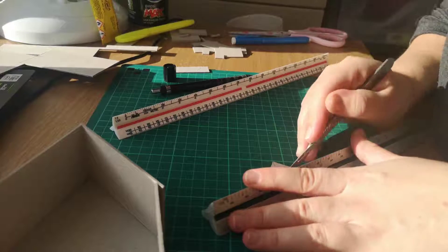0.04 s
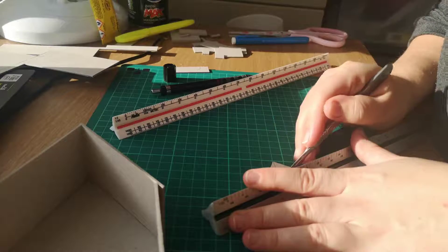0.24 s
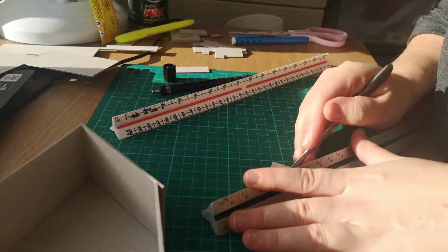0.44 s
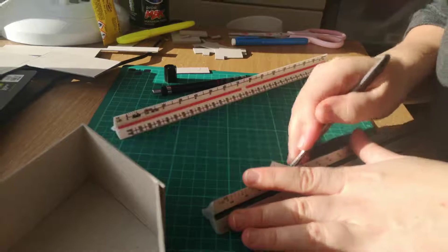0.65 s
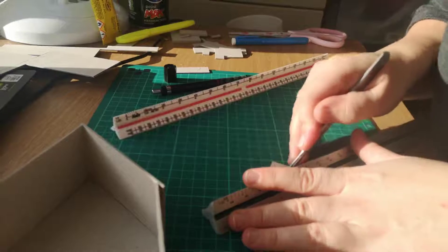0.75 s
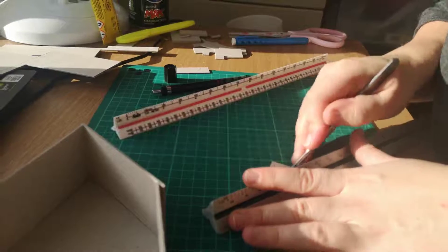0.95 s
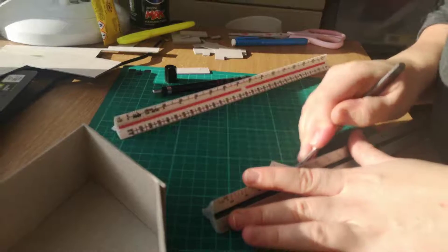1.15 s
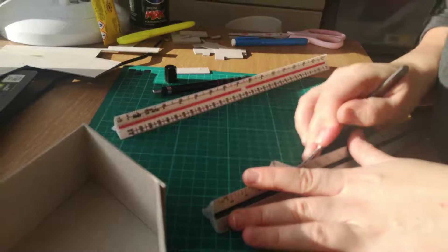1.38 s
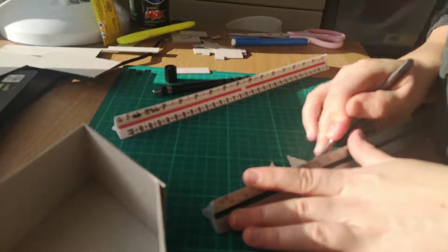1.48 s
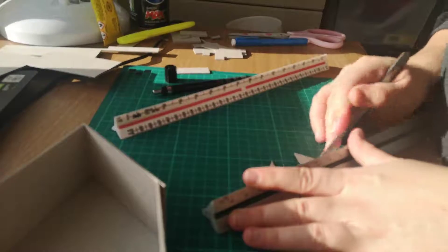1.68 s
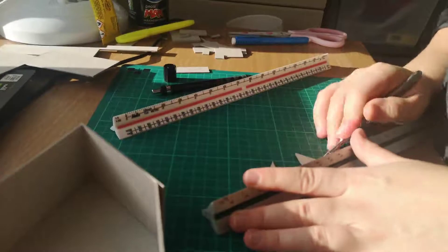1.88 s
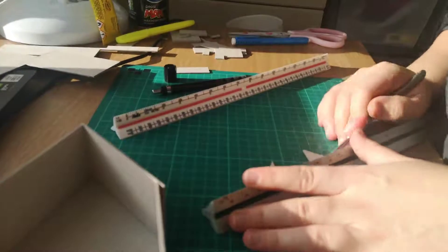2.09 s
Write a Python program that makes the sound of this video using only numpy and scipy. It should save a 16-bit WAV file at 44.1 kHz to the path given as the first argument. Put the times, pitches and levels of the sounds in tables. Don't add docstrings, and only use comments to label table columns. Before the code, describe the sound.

A craft knife cuts thin card along a ruler, close up in a quiet, dry room. A short scratch with tiny blade ticks comes at 0.15 s, then faint taps around 0.65 s. From 0.93 s the blade bites and scrapes unevenly with small knocks. At 1.48 s a hand thumps the desk with a sharp click and the loudest rasp, fading by 1.7 s. Faint scratching returns near 2.1 s over low hum and hiss.

```python
import sys
import numpy as np
from scipy import signal
from scipy.fft import rfft, irfft
from scipy.io import wavfile
from scipy.ndimage import uniform_filter1d

SR = 44100
rng = np.random.default_rng(int(sys.argv[2]) if len(sys.argv) > 2 else 0)


def bounce(signal):
    frames = np.transpose(np.atleast_2d(signal))
    limited = np.clip(frames, -1, 1)
    pcm = np.round(limited * 32767).astype(np.int16)
    wavfile.write(sys.argv[1], SR, pcm)


def amplitude_ratio(level_db):
    exponent = np.asarray(level_db, float) / 20
    return 10 ** exponent


N = 93800
LAG_MS = 0.604

# t/s, friction level/dB, desk shake level/dB
TOUCH_DRAG = [(.136, -89, -69), (.139, -65, -80), (.16, -54.5, -57), (.175, -63.5, -61), (.19, -65.5, -67),
              (.205, -90, -81), (.225, -98, -76)]
BITE_DRAG = [(0.901, -72, -63), (0.938, -73, -61), (0.947, -60.5, -45.5), (.975, -59, -48),
             (1.009, -63, -62), (1.043, -83, -58)]
SCORE_DRAG = [(0.998, -67, -74), (1.044, -65.5, -68), (1.052, -65, -53), (1.083, -65.5, -68),
              (1.088, -60.5, -65), (1.108, -65, -58.5), (1.118, -59.5, -67.5), (1.175, -59.5, -51.5),
              (1.21, -61.5, -53), (1.224, -59, -49), (1.272, -64, -59), (1.332, -64.5, -74),
              (1.354, -61.5, -59), (1.412, -64.5, -66), (1.47, -62, -57.5), (1.483, -62.5, -54)]
PULL_DRAG = [(1.48, -65, -71), (1.484, -54, -71), (1.497, -58, -44), (1.53, -52.5, -47), (1.575, -53, -47),
             (1.611, -57.5, -49.5), (1.629, -67, -56), (1.67, -72.5, -63), (1.74, -77.5, -71.5)]
NEXT_DRAG = [(1.849, -85, -66.5), (1.9, -75.5, -76), (1.97, -85.5, -69.5), (2.0, -73.5, -73),
             (2.05, -74, -60.5), (2.095, -72, -72), (2.127, -63.5, -61.5)]
# f/Hz, level per Hz/dB
PULL_TONE = [(250, -12), (900, -5.5), (1440, -10.5), (2690, -5), (3300, -14), (7540, -15), (10200, -23),
             (15500, -42)]
# f/Hz, width/Hz, lift/dB
PULL_RING = [(820, 62, 12.3), (1015, 40, 5), (1245, 68, 11.8), (1630, 130, 4), (2070, 110, 11.7),
             (2490, 33, 4.8), (2696, 180, 9), (3950, 120, 10), (4390, 80, 8.1), (5780, 98, 8.5),
             (7370, 350, 8.1)]


def unit(x):
    return x / np.sqrt(np.mean(x ** 2))


def on_log_axis(tone, outside=None):
    f = np.maximum(np.arange(N // 2 + 1) * SR / N, 1)
    tone = np.array(tone)
    return np.interp(np.log(f), np.log(tone[:, 0]), tone[:, 1], left=outside, right=outside)


def colour(x, tone, rings=(), patches=None):
    f = np.maximum(np.arange(N // 2 + 1) * SR / N, 1)
    spectrum = rfft(x) * amplitude_ratio(on_log_axis(tone, -90))
    out = irfft(spectrum, N)
    for k, (hz, width, db) in enumerate(rings):
        resonance = (amplitude_ratio(db) - 1) / (1 + (2 * (f - hz) / width) ** 2)
        lift = irfft(spectrum * resonance, N)
        swelling = patches is not None and db > 0
        out = out + lift * (patches[k] if swelling else 1)
    return unit(out)


def walk(rate):
    k = int(SR / rate)
    steps = np.repeat(rng.standard_normal(N // k + 1), k)
    smooth = uniform_filter1d(uniform_filter1d(steps, k), k)
    return unit(smooth[:N])


def gain(rows, col):
    rows = np.array(rows)
    return amplitude_ratio(np.interp(np.arange(N) / SR, rows[:, 0], rows[:, col], left=-120, right=-120))


def pair(x, ms):
    left_db = 1
    f = np.arange(N // 2 + 1) * SR / N
    late = irfft(rfft(x) * np.exp(-2j * np.pi * f * ms / 1000), N)
    return np.array([x * amplitude_ratio(left_db / 2), late * amplitude_ratio(-left_db / 2)])


def floor():
    # f/Hz, level per Hz/dB
    hum_tone = [(12, -71), (20, 2.5), (59, -10.5), (76, -11.5), (107, -15.5), (134, -21.5), (210, -20.5),
                (568, -36), (700, -35), (910, -105), (1540, -120)]
    hiss_tone = [(290, -36), (500, -12), (666, -71), (716, 1), (1770, 2.5), (4130, -4), (7760, -7.5),
                 (9770, -14.5), (16200, -16)]
    # f/Hz, width/Hz, lift/dB
    hiss_ring = [(1950, 400, 3), (2610, 280, 4.6), (8300, 430, 1.4)]
    hum_db, hiss_db = -61, -73
    alike_below_hz, hiss_alike = 900, 0.36
    n = rng.standard_normal((5, N))
    apart = signal.lfilter(*signal.butter(2, alike_below_hz, "high", fs=SR), n[1])
    swell = amplitude_ratio(1.94 * walk(9.4))
    hum = [colour(v + w * apart, hum_tone) * swell for v, w in zip(pair(n[0], 0.52), (1, -1))]
    hiss = []
    for shared, own in zip(pair(n[2], LAG_MS), n[3:]):
        side = colour(hiss_alike * shared + own, hiss_tone, hiss_ring)
        hiss.append(side * amplitude_ratio(0.94 * walk(6.71)))
    return amplitude_ratio(hum_db) * np.array(hum) + amplitude_ratio(hiss_db) * np.array(hiss)


def room(x):
    t60_s, level_db, low_cut_hz = .1, -7, 410
    t = np.arange(SR // 3) / SR
    tail = rng.standard_normal((2, len(t))) * amplitude_ratio(-60 * t / t60_s) * (t > .002)
    tail = tail / np.sqrt(np.sum(tail ** 2, axis=1, keepdims=True))
    x = signal.lfilter(*signal.butter(2, low_cut_hz, "high", fs=SR), x)
    return amplitude_ratio(level_db) * signal.fftconvolve(x[None], tail, axes=1)[:, :N]


def strike(rows, modes):
    push, t = np.zeros(N), np.arange(N) / SR
    for s, db, ms, way in rows:
        contact = np.clip((t - s) * 1000 / ms, 0, 1)
        push += way * amplitude_ratio(db) * np.sin(np.pi * contact) ** 2
    ring = np.zeros(N)
    for hz, db, t60 in modes:
        ring += amplitude_ratio(db - 60 * t / t60) * np.cos(2 * np.pi * hz * t) * 2 * np.pi * hz / SR
    return push, signal.fftconvolve(push, ring[:SR // 2])[:N]


def desk():
    # t/s, level/dB, contact/ms, push direction
    knocks = [(.337, -62, 12, 0.88), (.788, -60.5, 12, 0.73), (0.945, -57, 7.5, 1), (.962, -53, 8.9, 0.92),
              (.978, -54.5, 4.8, 0.96), (1.028, -62, 8.6, 0.7), (1.145, -60, 9.1, 0.91),
              (1.205, -63.5, 5.2, 0.8), (1.275, -51.5, 10.6, 0.49), (1.335, -65, 5.4, 0.81),
              (1.665, -59.5, 2.4, 0.48), (2.031, -58, 8.8, 0.31)]
    landing = [
        (1.4812, -30, 5.7, -1),
        (1.4848, -29.5, 9.3, 1),
        (1.5074, -29.4, 13, -1),
        (1.5348, -39.7, 5.9, 1),
        (1.5931, -46, 8.9, 1),
    ]
    taps = [(.1366, -42.5, 2.75, -0.42), (.6372, -47, 2.26, 0.66), (.65, -55.5, 1.86, 1),
            (.777, -67, 3.2, 0.52), (.945, -55.5, 2.9, 0.82), (.967, -47.5, 3, -0.49),
            (1.123, -53, 2, 0.69), (1.148, -47, 2, -0.69), (1.345, -59, 2.6, 0.35),
            (1.483, -40.5, 2.2, -0.56), (1.535, -44, 3.7, 0.97), (1.605, -49.5, 2.25, 1),
            (1.66, -51, 4.7, -0.82), (2.003, -70, 1.8, 0.39), (2.023, -58.5, 4.1, -0.95)]
    # f/Hz, level/dB, t60/s
    desk_modes = [(56.8, -15.4, .33), (82.7, 0, .18), (120.4, -4.6, .12), (152.5, -6.5, .23),
                  (201.6, -18.8, .25), (304.7, -6.6, .15)]
    card_modes = [(76, -0.5, 0.088), (142, -8, 0.15), (196.7, -15.5, 0.22), (299, -17.5, 0.17),
                  (435.6, -19.5, 0.077), (535, -29.5, 0.45), (810, -16, 0.17)]
    # f/Hz, level per Hz/dB
    shake_tone = [(12, -7), (20, -6), (70, -9), (118, -3), (248, -29.5), (308, -23.5), (377, -24),
                  (500, -23), (650, -50), (1100, -120)]
    shake = colour(rng.standard_normal(N), shake_tone)
    all_drags = (TOUCH_DRAG, BITE_DRAG, SCORE_DRAG, PULL_DRAG, NEXT_DRAG)
    effort = sum(gain(rows, 2) for rows in all_drags)
    thumps = strike(knocks + landing, desk_modes)[1]
    pats = sum(strike(taps, card_modes))
    return thumps + pats + shake * effort


def fibres():
    clicks_per_s, spread_db, flutter_db = 12000, 1.6, 1.5
    u = rng.random((3, N))
    size = amplitude_ratio(-spread_db * np.log(u[1] + 1e-9))
    clicks = (u[0] < clicks_per_s / SR) * size * np.sign(u[2] - .5)
    return clicks * amplitude_ratio(flutter_db * walk(60.23))


def blade():
    # t/s, level/dB, t60/s, ring f/Hz
    ticks = [(.1372, -63, .08, 4330), (.1378, -63, .05, 2750), (.149, -62, .05, 2900),
             (.154, -70, .05, 4350), (.164, -60, .09, 2850), (.170, -67, .05, 4360), (.178, -66, .08, 4330),
             (.2, -74, .04, 4370), (.263, -73, .04, 4400), (.269, -73, .04, 4400), (.9462, -59, .04, 2000),
             (.9677, -54, .05, 2050), (.994, -59, .04, 2800), (1.05, -61, .08, 2800),
             (1.056, -65, .05, 3150), (1.0864, -64, .04, 3000), (1.1667, -57, .05, 1600),
             (1.1667, -57, .05, 2850), (1.222, -59, .05, 2900), (1.3478, -61, .05, 2850),
             (1.4835, -50, .07, 2070), (1.4845, -52, .07, 2420), (1.519, -52, .12, 2100),
             (1.537, -55, .1, 2700), (1.553, -52, .06, 2000), (1.553, -54, .08, 2720),
             (1.576, -52, .05, 2050), (1.575, -53, .07, 2710), (1.601, -53, .04, 2650)]
    rise_s, crack_db = 0.0006, -12
    crack = amplitude_ratio(crack_db) * colour(fibres(), PULL_TONE, PULL_RING)
    out = 0
    for s, db, t60, hz in ticks:
        t = np.arange(N) / SR - s
        envelope = amplitude_ratio(db - 60 * np.clip(t, 0, 1) / t60) * np.clip(t / rise_s, 0, 1)
        out = out + envelope * (np.sin(2 * np.pi * hz * t) + crack)
    return out


def drags(patches):
    # f/Hz, level per Hz/dB
    touch_tone = [(300, 3), (900, -15.5), (3050, -10), (3500, -19), (5200, -17.5), (9600, -9.5),
                  (10600, -22), (15000, -25)]
    bite_tone = [(300, -0.5), (800, -4), (1440, -8.5), (2100, -11.5), (3900, -16.5), (5000, -33),
                 (8500, -15.5), (9800, -32)]
    score_tone = [(250, -2.5), (1300, -14.5), (3050, -9.5), (3250, -19), (5300, -26), (8400, -15.5),
                  (10000, -35), (15000, -41)]
    next_tone = [(410, -12), (900, -5), (2080, -1), (2780, 3.5), (3380, -12), (4200, -10), (8000, -17.5),
                 (15000, -32)]
    # f/Hz, width/Hz, lift/dB
    touch_ring = [(850, 200, 7), (2460, 130, 14.5), (2800, 240, 9.5), (3300, 250, -28), (4310, 90, 21),
                  (6200, 120, 5), (8230, 150, 11), (8800, 170, 6), (9630, 300, 6.5)]
    score_ring = [(837, 150, 8.9), (1041, 17, 13.6), (1582, 24, 9.2), (2100, 500, 8), (2780, 125, 9.6),
                  (2980, 35, 8.4), (3900, 350, 8.8), (7630, 190, 5.2), (8800, 760, 5.4)]
    treble_hz, treble_slope, effort_at_db = 3500, 1.2, -60
    strokes = [(TOUCH_DRAG, touch_tone, touch_ring), (SCORE_DRAG, score_tone, score_ring),
               (PULL_DRAG, PULL_TONE, PULL_RING), (NEXT_DRAG, next_tone, ()),
               (BITE_DRAG, bite_tone, score_ring[2:5])]
    out = 0
    for rows, tone, ring in strokes:
        friction = colour(fibres(), tone, ring, patches)
        effort = gain(rows, 1)
        body = signal.filtfilt(*signal.butter(2, treble_hz, fs=SR), friction)
        lift = (effort / amplitude_ratio(effort_at_db)) ** treble_slope if rows is SCORE_DRAG else 1
        out = out + effort * (body + lift * (friction - body))
    return out


def scene():
    patches = amplitude_ratio(2 * np.array([walk(35) for _ in PULL_RING]))
    cut, ticks, table = drags(patches), blade(), desk()
    own = np.array([drags(patches), drags(patches)])
    wide = signal.lfilter(*signal.butter(2, 900, "high", fs=SR), own)
    direct = pair(cut, LAG_MS) + ticks + wide + pair(table, 0.38)
    return direct + room(cut + ticks + table) + floor()


def roll_off(x):
    return signal.sosfilt(signal.butter(12, 15700, fs=SR, output="sos"), x)


def record(dry):
    # f/Hz, level/dB
    lean = [(150, -1), (220, -1.5), (700, 3.5), (1300, 0), (2400, -1.5), (5000, 0), (9000, -1),
            (14000, -0.5)]
    tilt = amplitude_ratio(np.outer([.5, -.5], on_log_axis(lean)))
    leaning = irfft(rfft(dry) * tilt, N)
    mix = signal.lfilter(*signal.butter(1, 15, "high", fs=SR), leaning)
    return roll_off(mix)


dry = scene()
out = record(dry)
bounce(out)
```